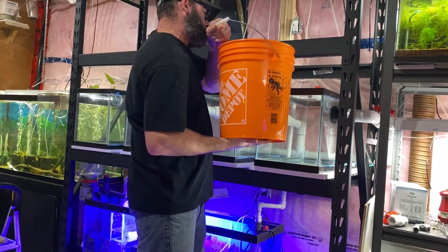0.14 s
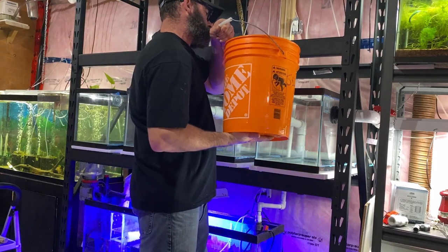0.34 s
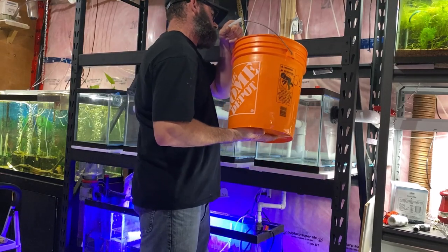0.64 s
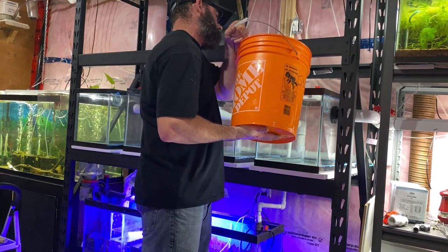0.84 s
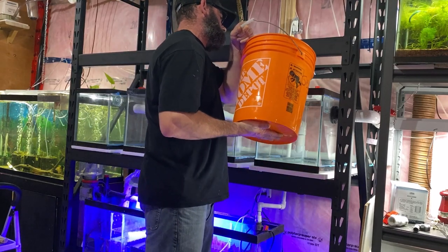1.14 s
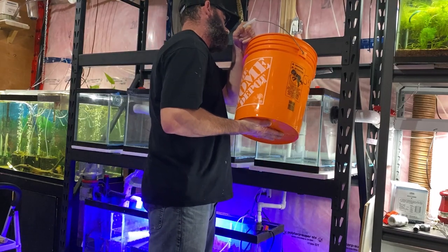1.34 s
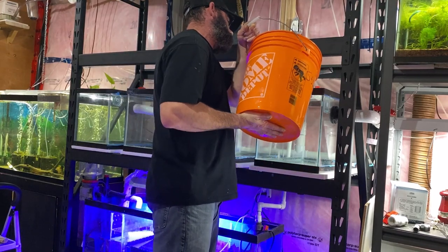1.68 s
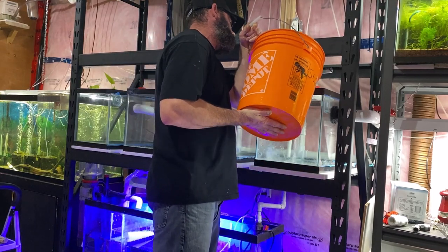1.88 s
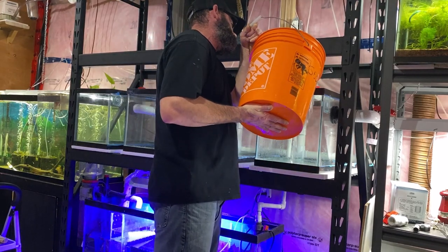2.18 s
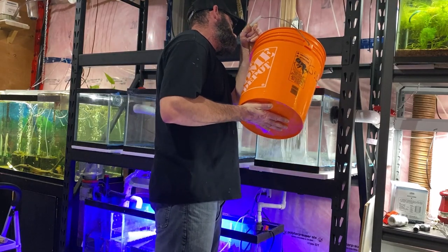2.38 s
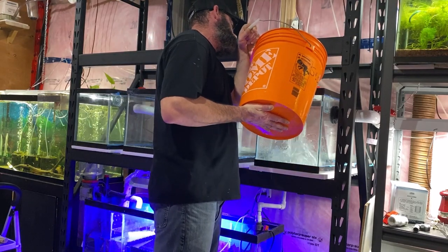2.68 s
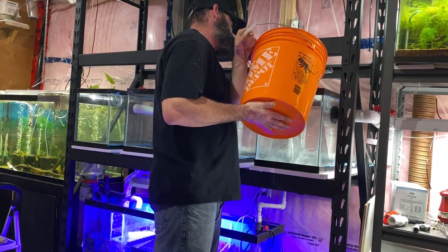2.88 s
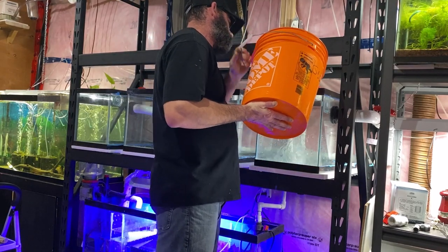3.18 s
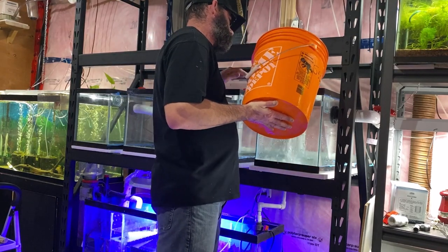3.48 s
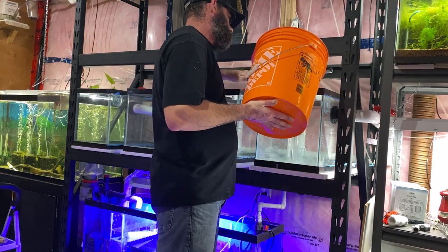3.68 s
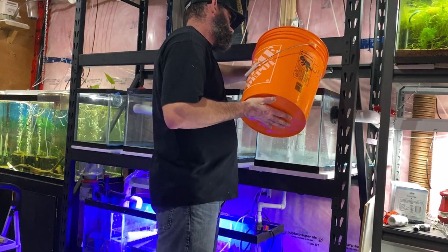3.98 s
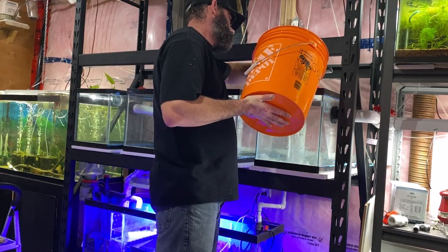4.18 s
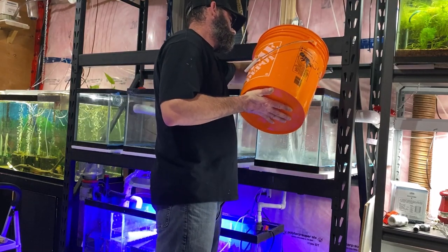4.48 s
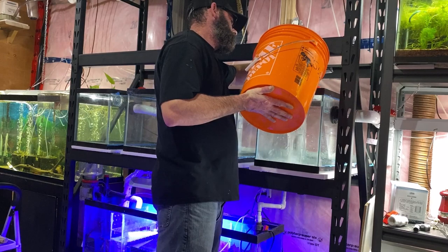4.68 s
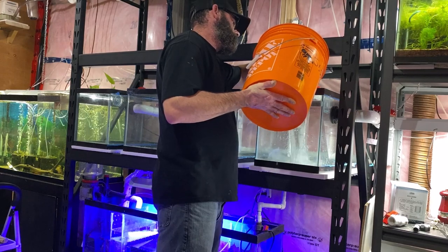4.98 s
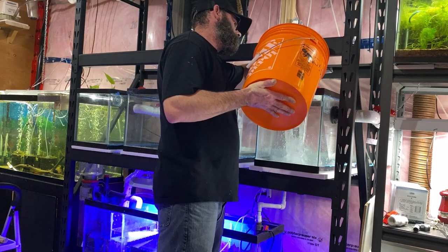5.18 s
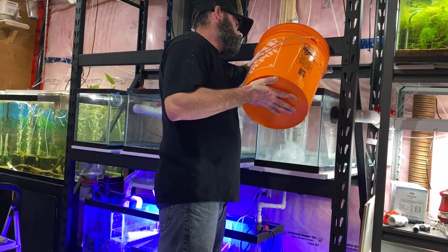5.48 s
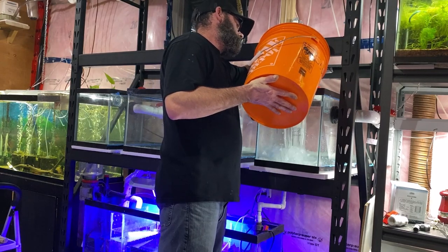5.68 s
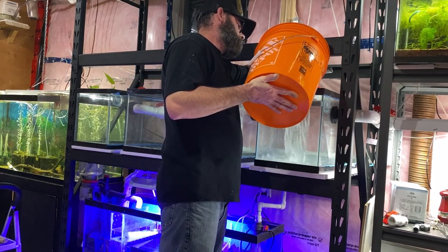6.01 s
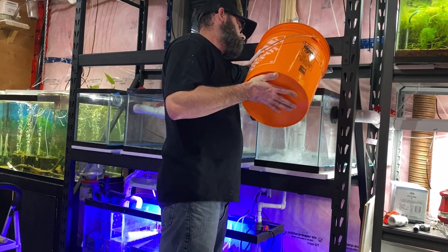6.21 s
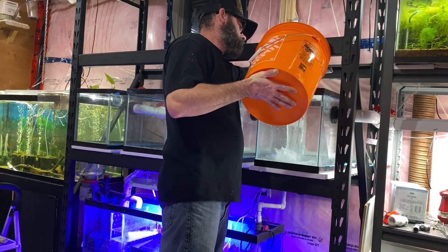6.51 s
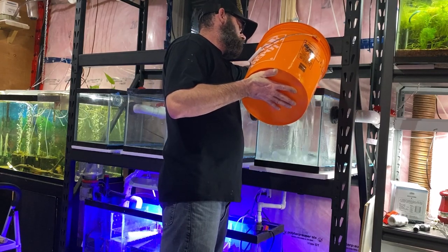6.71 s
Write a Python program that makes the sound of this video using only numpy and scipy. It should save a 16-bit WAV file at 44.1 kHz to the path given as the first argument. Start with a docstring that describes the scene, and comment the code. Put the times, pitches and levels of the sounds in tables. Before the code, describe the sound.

Low hum and faint filter noise underlie a close, lightly reverberant stereo scene. A few soft slaps of water in a bucket lead to a first splash and glug, then an uneven, spraying trickle. A hard plastic clack with a quick rattle comes halfway. After a thinner spell, the stream grows steadily into a splashy, churning pour with singing air bubbles, still running at the end.

```python
"""Bucket emptied into a glass tank

A plastic bucket is tipped over a bare glass tank in a room full of air pumps and filters: shaped noise and hum.
Slugs of water slap and hiss, air pockets sing as gliding sines, and the stream is clicks: spray and bubbles.
The wire handle drops on the bucket and rattles, driving the same wall modes as the draining water.
Two spaced microphone ports pick it up, partly in common and partly each with its own reverberation."""
import sys
import numpy as np
from scipy import signal
from scipy.fft import rfft, irfft, next_fast_len
from scipy.io import wavfile

SR = 44100
rng = np.random.default_rng(int(sys.argv[2]) if len(sys.argv) > 2 else 0)


def boost_factor(decibels):
    """Convert a level in decibels to a linear amplitude factor."""
    exponent = np.asarray(decibels, float) / 20
    return 10 ** exponent


def file_out(sig):
    """Save sig as 16-bit WAV at sys.argv[1]."""
    # one column per channel
    cols = np.atleast_2d(sig).T
    # limit, then scale
    lim = np.clip(cols, -1, 1)
    pcm = np.round(lim * 32767).astype(np.int16)
    wavfile.write(sys.argv[1], SR, pcm)


N = 302085

# modes of the bucket wall: [f/Hz, level/dB, t60/s]
BUCKET_MODES = [(171.3, -12, 0.36), (219.8, -12, 0.21), (308.6, -10, 0.097), (338, -1.5, 0.017),
                (399.2, -5.5, 0.089), (528, -2, 0.02), (582, -8, 0.065), (650, -8.5, 0.031),
                (782, 0, 0.029), (920, -8.5, 0.038), (1002, -21, 0.017), (833, -6, 0.029),
                (1075, -1, 0.031), (1130, -6, 0.018), (1190, -7.5, 0.062), (1310, -4.5, 0.028),
                (1397, -5.5, 0.082), (1480, -5, 0.022), (1674, -4, 0.019), (1816, -14, 0.025),
                (1910, -5.5, 0.022), (2227, -8, 0.034), (2485, -8, 0.061), (2930, -2, 0.0077),
                (3480, -8.5, 0.037), (4300, -8, .03), (5500, -23, .03)]


def rms_one(x):
    """Scale to rms 1."""
    return x / np.sqrt(np.mean(x ** 2) + 1e-20)


def in_time(rows):
    """Columns joined by straight lines, one value a sample; -120 before the first row."""
    s, *columns = np.transpose(rows)
    return [np.interp(np.arange(N) / SR, s, c, left=-120) for c in columns]


def at_hz(points, hz):
    """Read a spectrum on a log frequency axis."""
    return np.interp(np.log(hz), np.log(np.array(points)[:, 0]), np.array(points)[:, 1])


def band_noise(x, order, low_hz, high_hz):
    """Pass one band of a signal."""
    return signal.sosfilt(signal.butter(order, [low_hz, high_hz], "band", fs=SR, output="sos"), x)


def drift(rate_hz):
    """Slow random wander of spread 1: low-passed noise made every 40 samples, then joined by lines."""
    r = np.exp(-80 * np.pi * rate_hz / SR)
    noise = rng.standard_normal(N // 40 + 2002)
    slow = signal.lfilter([1], [1, -2 * r, r * r], noise)[2000:]      # skip the settling
    return np.interp(np.arange(N) / 40, np.arange(len(slow)), rms_one(slow))


def ring(x, hz, t60):
    """A resonator: a unit click sets a sine of height 1 ringing."""
    r, w = boost_factor(-60 / (t60 * SR)), 2 * np.pi * hz / SR
    return signal.lfilter([0, np.sin(w)], [1, -2 * r * np.cos(w), r * r], x + 1e-18)


def grains(per_s, spread_db):
    """Clicks at random moments, of random sign and exponentially spread level, on three paths."""
    levels_db = spread_db * np.minimum(rng.exponential(1, (3, N)), 5)
    sizes = boost_factor(levels_db) * rng.choice([-1, 1], (3, N))
    return sizes * (rng.random((3, N)) < per_s / SR)


def room_noise():
    """Steady rumble and hiss of pumps and filters: noise shaped in frequency, unrelated on the three paths."""
    # room spectrum, relative: [f/Hz, level/dB]
    spectrum = [(25, -41), (45, -2), (80, 6.5), (150, -4.5), (300, -8), (600, -13.5), (1200, -23),
                (2500, -30.5), (5000, -37), (9000, -40.5), (16000, -47)]
    rms_db = -44.5
    hz = np.maximum(np.fft.rfftfreq(N, 1 / SR), 1)
    shaped = rfft(rng.standard_normal((3, N))) * boost_factor(at_hz(spectrum, hz))
    return boost_factor(rms_db) * rms_one(irfft(shaped, N))


def hum():
    """A steady mains tone, barely wavering in level."""
    hz, peak_db, waver_db = 59.7, -34, 0.38
    tone = np.sin(2 * np.pi * hz * np.arange(N) / SR + 2.0)
    return boost_factor(peak_db + waver_db * drift(4.5)) * tone


def splashes(spread=0.16, slap_db=11.5):
    """Each slug slaps, then dies as a hiss while a few squeezed air pockets of near pitch ring under it."""
    # water slapping, first inside the bucket, then on the glass: [t/s, level/dB, f/Hz of the middle pocket]
    slugs = [(.181, -43, 1130), (0.622, -42, 1770), (1.015, -36.5, 1380), (1.29, -37, 1360),
             (1.407, -35, 1220), (1.735, -41.5, 2260), (1.748, -40.5, 2130), (1.79, -43, 2300),
             (1.94, -44, 2580), (2.079, -37.5, 5360), (2.24, -64, 2200), (2.311, -39.5, 6060),
             (2.408, -50, 1310), (4.048, -45, 1400), (4.079, -63, 2200), (4.25, -49, 1140),
             (4.256, -39, 2040), (4.301, -42, 1520), (4.641, -38.5, 1730), (4.761, -39, 1410),
             (6.011, -47, 1510), (6.645, -38, 1190)]
    attack_s, slap_s, t60_s, cycles = 0.001, 0.0013, 0.32, 10
    hiss_db, hiss_fall_db_per_s = -14, 100      # against the ringing; the fall is on top of t60_s
    out, t = np.zeros((3, N + SR)), np.arange(SR // 2) / SR
    noise = rng.standard_normal((len(slugs), 3, len(t)))
    detune = np.abs(rng.standard_normal((len(slugs), 2)))
    for (s, db, hz), n, (down, up) in zip(slugs, noise, detune):
        shape = (1 - np.exp(-t / attack_s)) * boost_factor(db - 60 * t / t60_s) / 2
        shape *= 1 + boost_factor(slap_db) * np.exp(-t / slap_s)
        hiss = rms_one(band_noise(n, 2, 1500, 3800))
        pitches = hz * np.exp([-0.1 - spread * down, 0, 0.19 + spread * up])
        body = rms_one(sum(ring(n, near_hz, cycles / near_hz) for near_hz in pitches))
        start = round(s * SR)
        out[:, start:start + len(t)] += shape * (body + boost_factor(hiss_db - hiss_fall_db_per_s * t) * hiss)
    return out[:, :N]


def glugs(rise=0.017, swell_s=0.0097, wobble_db=6.0, waver=0.015):
    """A pocket swells, rings unsteadily and climbs a little in pitch as it nears the surface."""
    # lone air pockets singing: [t/s, level/dB before swell and wobble, starting f/Hz, t60/s]
    pockets = [(1.222, -37, 1203, 0.082), (1.744, -23, 1980, 0.079), (1.748, -30, 1630, 0.084),
               (1.79, -30, 1955, 0.05), (1.938, -42, 2295, 0.12), (1.938, -42.5, 2920, 0.14),
               (1.96, -36, 2244, 0.11), (2.025, -42, 2370, 0.08), (2.411, -40, 1350, 0.094),
               (2.515, -39, 2020, 0.049), (2.744, -40, 1058, 0.1), (2.775, -30, 1073, 0.095),
               (2.805, -31, 2300, 0.054), (2.93, -37, 1380, 0.054), (3.121, -48, 1057, 0.1),
               (3.15, -37, 2270, 0.055), (3.17, -42, 1406, 0.15), (3.05, -43, 932, 0.12),
               (3.829, -41, 1110, 0.12), (3.955, -41, 1490, 0.1), (4.05, -43, 1096, 0.14),
               (4.04, -47, 1384, 0.2), (4.075, -43, 2230, 0.065), (4.246, -34, 1030, 0.08),
               (4.255, -30, 1350, 0.06), (4.305, -35.5, 1458, 0.085), (5.015, -32.5, 783, 0.077),
               (5.154, -36, 1310, 0.11), (5.25, -31, 1000, 0.077), (5.275, -37, 945, 0.1),
               (5.392, -26, 1040, 0.059), (5.493, -42, 1050, .07), (5.511, -34, 1360, .08),
               (5.615, -33, 920, 0.077), (5.69, -42, 940, 0.14), (5.569, -20, 1230, 0.06),
               (5.8, -34.5, 850, 0.14), (5.89, -35, 1000, 0.087), (6.084, -35, 1324, 0.079),
               (6.09, -43.5, 570, 0.33), (6.155, -39.5, 569, 0.31), (6.17, -28.5, 1437, .12),
               (6.322, -36.5, 1320, 0.22), (6.39, -38.5, 1420, 0.27), (6.35, -37, 1140, 0.14),
               (6.43, -31.5, 570, 0.066)]
    out, t = np.zeros(N + SR), np.arange(SR // 2) / SR
    unsteady = np.pad(drift(35), (0, SR))      # the churning water squeezes every pocket
    for s, db, hz, t60 in pockets:
        start = round(s * SR)
        squeeze = np.cumsum(unsteady[start:start + len(t)]) / SR
        phase = 2 * np.pi * hz * (t + rise * t ** 2 / t60 + waver * squeeze)
        envelope = (1 - np.exp(-t / swell_s)) * boost_factor(db - 60 * t / t60)
        out[start:start + len(t)] += envelope * np.sin(phase)
    return out[:N] * boost_factor(wobble_db * drift(30))


def blows(crack_db=-6.5, crack_s=0.00042):
    """Each blow is a rough, band-limited burst of contacts that drives the wall, plus a bright snap."""
    # blows on the bucket wall: [t/s, strength/dB, lowest driven f/Hz, highest driven f/Hz, contact time/s]
    knocks = [(1.294, -44, 186, 342, 0.023), (1.32, -47, 186, 342, 0.025), (3.387, -15, 338, 2980, 0.0053),
              (3.394, -37, 351, 450, 0.0037), (3.43, -53.5, 192, 266, 0.0067),
              (3.51, -27, 610, 2700, 0.0025), (3.54, -56, 500, 1570, 0.0047),
              (3.56, -51.5, 500, 1700, 0.0046), (3.578, -31.5, 1530, 4070, 0.009),
              (3.627, -37, 750, 1600, 0.0036), (3.638, -57, 920, 1750, 0.004),
              (5.907, -36.5, 197, 1690, 0.04), (5.925, -50, 171, 433, 0.02)]
    drive, cracks, t = np.zeros(N), np.zeros(N), np.arange(SR // 5) / SR
    rough = rng.standard_normal((len(knocks), 2, len(t)))
    for (s, db, low_hz, high_hz, contact_s), (push, snap) in zip(knocks, rough):
        push[0] += 3.5 * np.sqrt(contact_s * SR)      # one firm first touch leads the burst
        push = band_noise(push * np.exp(-t / contact_s), 3, low_hz, high_hz)
        start = round(s * SR)
        energy = np.sum(push ** 2) * (high_hz - low_hz) / SR      # evens out the push across bandwidths
        drive[start:start + len(t)] += boost_factor(db) * push / np.sqrt(energy) / 10
        # every blow snaps: the higher its band and briefer the contact, the stronger the snap
        snap_gain = boost_factor(db + crack_db) * high_hz / 3000 * 0.0058 / contact_s
        cracks[start:start + len(t)] += snap_gain * np.diff(snap, prepend=0) * np.exp(-t / crack_s)
    return drive, cracks


def tremble():
    """The handle trembles on the wall after it drops, a patter of contacts, until a hand stills it."""
    from_s, start_db, fall_db_per_s = 3.4, -42, 31
    stilled_s, stilling_db_per_s = 3.71, 145      # an extra fall
    t = np.arange(N) / SR
    fading = start_db - fall_db_per_s * (t - from_s) - stilling_db_per_s * np.maximum(t - stilled_s, 0)
    level_db = np.where(t > from_s, fading, -200)
    contacts = grains(1600, spread_db=2.5)[0]
    soft = signal.lfilter(*signal.butter(2, [450, 2200], "band", fs=SR), contacts)
    return boost_factor(level_db + 2.9 * drift(27)) * soft


def thrum(stream_db):
    """Water draining along the wall: low noise rings the first seven modes, fading as the bucket empties."""
    base_db, fade_db_per_s = -52.5, 1      # base level at 2 s, with a stream of -46 dB
    follows, wander_db = 0.93, 4.5      # dB per dB of stream; slow random spread
    fading_db = base_db - fade_db_per_s * (np.arange(N) / SR - 2)
    level_db = fading_db + follows * (stream_db + 46.0) + wander_db * drift(1.1)
    flow = signal.lfilter(*signal.butter(2, 420, fs=SR), rng.standard_normal(N))
    low_modes = sum(boost_factor(db) * ring(flow, hz, t60) for hz, db, t60 in BUCKET_MODES[:7])
    return boost_factor(level_db) * rms_one(low_modes)


def bucket(stream_db):
    """Blows and the handle's tremble drive all wall modes, of alternating sign; snaps and thrum join them."""
    drive, cracks = blows()
    drive = drive + tremble()
    wall = sum(boost_factor(db) * (-1) ** k * ring(drive, hz, t60) for k, (hz, db, t60) in enumerate(BUCKET_MODES))
    return wall + cracks + thrum(stream_db)


def spray_bursts():
    """Power of the short bursts of spray: a quick swell, then a steady fall."""
    # bursts of spray, the one at 3.385 s with the handle's knock:
    # [t/s, level/dB before swell and fall, swell time/s]
    bursts = [(1.411, -45.5, 0.01), (1.476, -48, 0.0037), (1.734, -50.5, .004), (1.765, -38.5, 0.0067),
              (1.925, -34.5, 0.02), (2.08, -43.5, .005), (2.2, -49, .006), (2.29, -45, 0.028),
              (3.385, -32.5, 0.0011), (3.79, -44, 0.011), (3.92, -46, 0.0063), (4.04, -44, 0.0062),
              (4.145, -43.5, 0.0056), (4.25, -41, 0.044)]
    fall_db_per_s = 187
    out, t = np.zeros(N + SR), np.arange(SR) / SR
    for s, db, swell_s in bursts:
        start = round(s * SR)
        out[start:start + SR] += ((1 - np.exp(-t / swell_s)) * boost_factor(db - fall_db_per_s * t)) ** 2
    return out[:N]


def spray(level_db, patchy_db=1.06, shared_db=0.95):
    """Dense droplet impacts; every half octave flickers partly on its own."""
    # spray spectrum, relative: [f/Hz, level/dB per Hz]
    spectrum = [(300, -4), (700, -1), (1400, 5.5), (2500, 11), (4000, 7), (6000, 8.5), (9000, 1),
                (12000, 8), (15500, -12.5)]
    drops = [grains(9000, spread_db=0.0) for _ in range(2)]      # neighbouring bands get unrelated drops
    together, out = drift(16.0), 0
    edges = 250 * 2 ** np.arange(0, 6.1, 0.5)
    for k, (low, high) in enumerate(zip(edges, edges[1:])):
        band = band_noise(drops[k % 2], 2, low, high)
        hz = np.sqrt(low * high)
        own_db = patchy_db * min(1, 4000 / hz)      # the finest mist moves more as one
        out = out + band * boost_factor(at_hz(spectrum, hz) + own_db * drift(16.0) + shared_db * together)
    return boost_factor(level_db) * rms_one(out)


def droplets(level_db, low_hz=900, high_hz=6500, cycles=97.0):
    """Scattered drops falling back each ring one small bubble, of a pitch dealt at random."""
    born = grains(160, spread_db=-5.0)
    pitches, dealt = np.geomspace(low_hz, high_hz, 24), rng.integers(0, 24, N)
    rings = sum(ring(born * (dealt == k), hz, cycles / hz) for k, hz in enumerate(pitches))
    return boost_factor(level_db) * rms_one(rings)


def churning(level_db, low_hz=520, high_hz=2400, cycles=40.0):
    """Trapped air collapses in clumps, each bubble ringing some cycles; middling sizes are the loudest."""
    # the tank favours some bubble pitches: [f/Hz, bandwidth/Hz, lift/dB]
    tank = [(576, 10, 27), (1060, 83, 2.5), (1380, 210, 19), (1750, 550, 20.5)]
    born = grains(1000 * boost_factor(2.5 * drift(8)), spread_db=2.4)
    pitches, dealt = np.geomspace(low_hz, high_hz, 22), rng.integers(0, 22, N)
    rings = 0
    for k, hz in enumerate(pitches):
        size_db = -7.0 * np.log2(hz / 1200) ** 2
        rings = rings + boost_factor(size_db) * ring(born * (dealt == k), hz, cycles / hz)
    # bubbles swell rather than snap
    soft = signal.lfilter(*signal.butter(2, [500, 2600], "band", fs=SR), rings)
    favoured = 0
    for hz, width, db in tank:
        gain = boost_factor(db) * 2 * np.pi * width / SR
        favoured = favoured + gain * ring(soft, hz, np.log(1000) / (np.pi * width))
    return boost_factor(level_db) * rms_one(soft + favoured)


def paths(x, tail_db=-1.0):
    """The direct sound, and for each port a near shelf echo followed by the room's tail; equal energy."""
    t60_s, shelf_echo_s = 0.15, np.array([0.00011, 0.00028])      # echo delay for the left and right port
    t = np.arange(SR // 2) / SR
    tails = rng.standard_normal((2, len(t))) * boost_factor(-60 * t / t60_s)
    tails *= boost_factor(tail_db) / np.sqrt(np.sum(tails ** 2, axis=1, keepdims=True))
    tails[[0, 1], np.round(shelf_echo_s * SR).astype(int)] += 1
    tails /= np.sqrt(1 + boost_factor(2 * tail_db))
    return np.vstack([x, signal.fftconvolve(x[None], tails, axes=1)[:, :N]])


def ports(common, left, right):
    """Each port hears the common sound, late at the right, plus a reverberant part of its own."""
    # microphone ports: [f/Hz, share of power common to both, left over right/dB]
    pickup = [(0, 0.84, -15), (100, 0.84, 5), (287, 0.43, -0.3), (750, 0.057, -1), (3070, 0.52, -3),
              (5100, 0.23, -4.5), (5460, 0.26, -6), (6860, 0.77, 1), (8250, 0.89, 0.5), (11100, 0.69, 0),
              (15300, 0.78, 0)]
    # lag of the right port, in the treble a plain delay of a sixth of a millisecond: [f/Hz, phase/rad]
    phase_lag = [(0, 0), (300, 0), (3000, -1.1), (5000, -.9), (6100, 0), (9150, 3.14), (12200, 6.28),
                 (15300, 9.42), (22050, 16.4)]
    size = next_fast_len(N + SR // 10)
    hz, table = np.fft.rfftfreq(size, 1 / SR), np.transpose(pickup)
    share, lean_db = (np.interp(hz, table[0], c) for c in table[1:])
    share, lag = np.clip(share, 0, 1), np.interp(hz, *np.transpose(phase_lag))
    common, own = np.sqrt(share) * rfft(common, size), np.sqrt(1 - share)
    left = boost_factor(lean_db / 2) * (common + own * rfft(left, size))
    right = boost_factor(-lean_db / 2) * (common * np.exp(-1j * lag) + own * rfft(right, size))
    return irfft([left, right], size)[:, :N]


def scene():
    """All sources on three paths, then the ports, with the hum equal in both."""
    # the steady stream: [t/s, spray level/dB, trapped air level against the spray/dB]
    stream = [(1.72, -101, -20), (1.8, -47.5, -24), (2.27, -52.5, -30), (2.42, -41, -15), (2.87, -44, -11),
              (2.93, -49.5, -2), (3.05, -45, -8.5), (3.22, -46.5, -8), (3.3, -49, -5), (3.36, -49.5, -0.5),
              (3.5, -44, 4), (3.8, -49, -5.5), (4.45, -50.5, -10), (4.6, -45, -13.5), (5.05, -41.5, -3),
              (5.9, -42, -0.5), (6.4, -42.5, -1.5), (6.57, -44, -4), (6.66, -42, -2.5), (6.85, -44, -5)]
    stream_db, air_db = in_time(stream)
    spray_db = 10 * np.log10(boost_factor(2 * stream_db) + spray_bursts())
    water = splashes() + spray(spray_db) + droplets(spray_db - 10.0) + churning(stream_db + air_db)
    solo = paths(glugs() + bucket(stream_db))
    return ports(*(water + solo + room_noise())) + hum()


def top_cut(x):
    """Nothing passes above the cut-off."""
    return signal.sosfilt(signal.butter(12, 15780, fs=SR, output="sos"), x)


def record(dry):
    """Deliver the finished stereo mix."""
    return top_cut(dry)


dry = scene()
out = record(dry)
file_out(out)
```